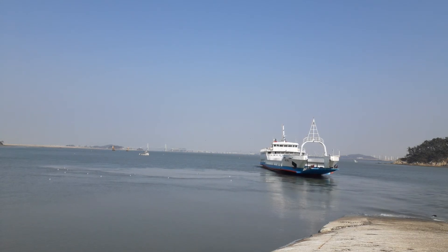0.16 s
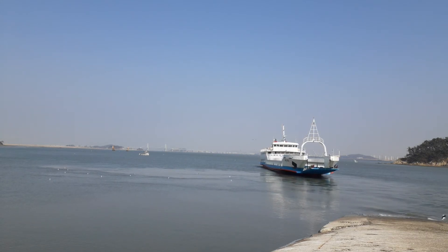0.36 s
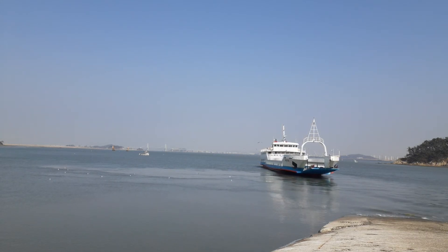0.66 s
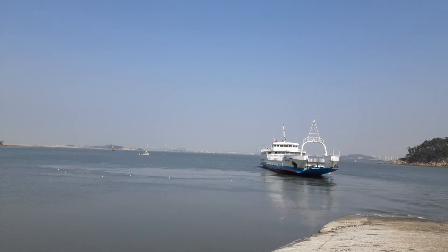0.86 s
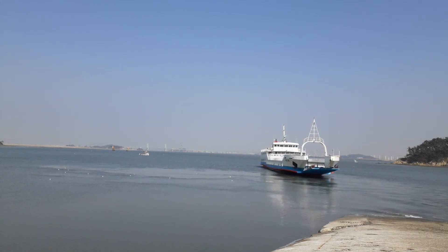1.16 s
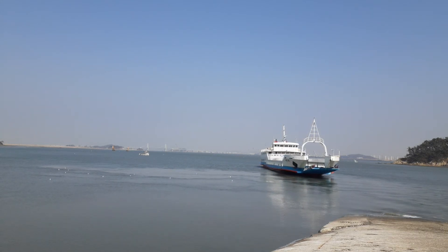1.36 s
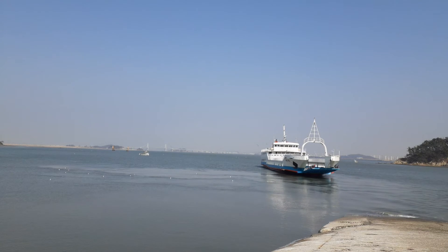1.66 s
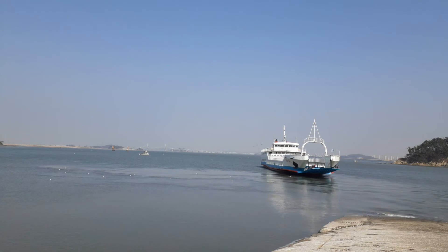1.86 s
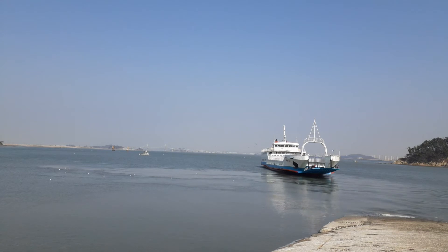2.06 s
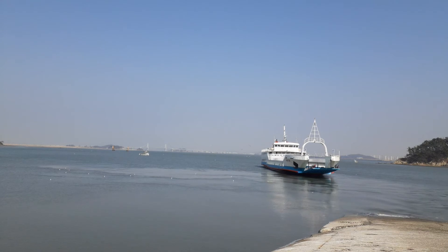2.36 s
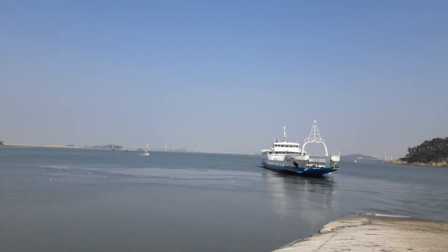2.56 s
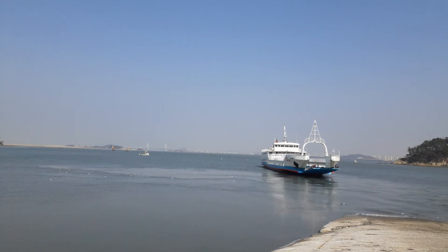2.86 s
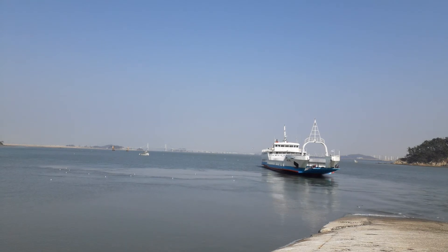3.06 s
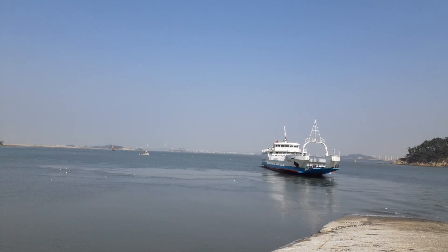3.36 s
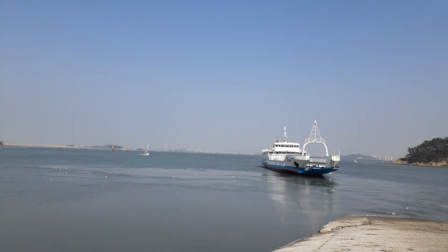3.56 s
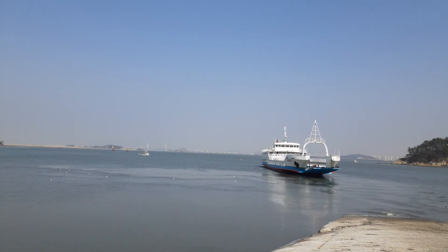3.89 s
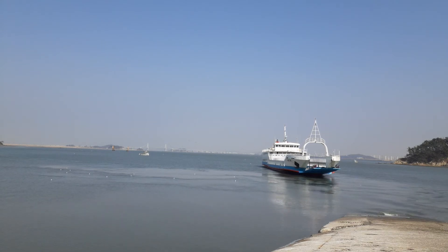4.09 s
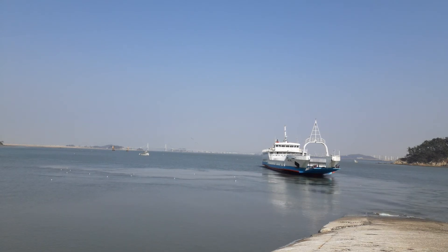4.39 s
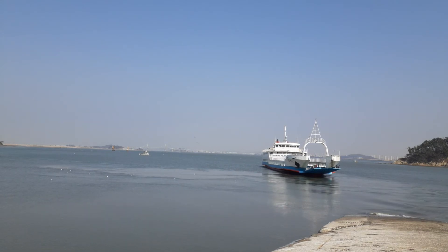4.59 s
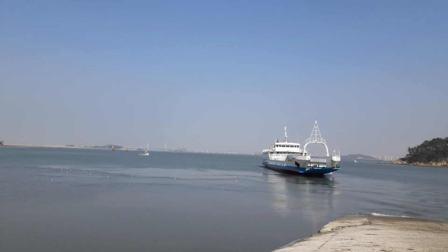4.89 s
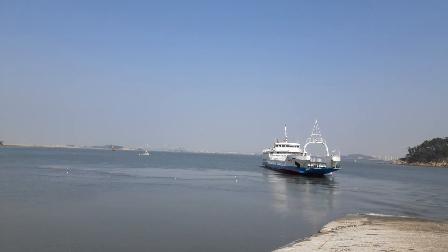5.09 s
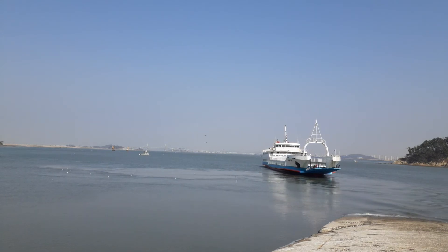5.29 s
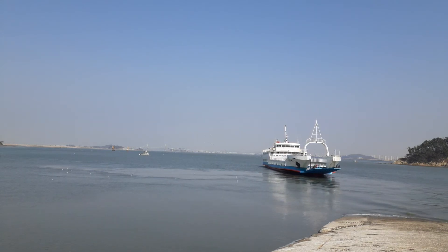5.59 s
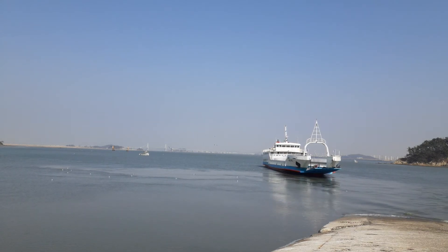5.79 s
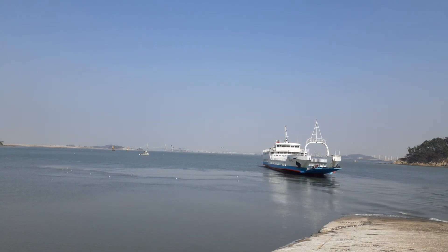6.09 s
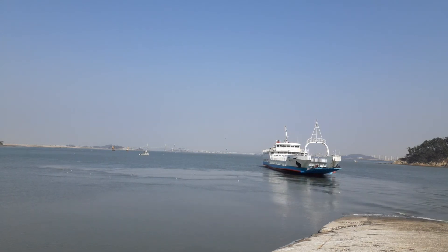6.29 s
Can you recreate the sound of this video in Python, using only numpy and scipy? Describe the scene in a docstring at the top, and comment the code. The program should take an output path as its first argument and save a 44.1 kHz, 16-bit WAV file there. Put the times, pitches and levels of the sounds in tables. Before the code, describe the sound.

A ferry idles a little way off a slipway, its diesel engines throbbing under a broad, dull rumble of exhaust, propellers and fans. A gull gives three short, hoarse, arched cries, a few seconds apart. Two low thuds come early and two more close together near the end. Small waves lap very faintly at the shore, and the microphone adds a slight hiss.

```python
"""A slipway on calm water, with a ferry idling in. Close diesel tones beat into a throb under a broad,
dull rumble of exhaust, propellers and fans, with a few soft thuds. Small waves wash the shore.
A gull gives three arched cries, each a thin rising lead-in that breaks into a full, hoarse stack
of harmonics shaped by its closing beak. The microphone adds a faint hiss."""
import sys
import numpy as np
from scipy import signal
from scipy.fft import rfft, irfft, next_fast_len
from scipy.io import wavfile
from scipy.ndimage import uniform_filter1d, map_coordinates

SR = 44100
rng = np.random.default_rng(int(sys.argv[2]) if len(sys.argv) > 2 else 0)


def digitize_waveform(pressure):
    """Quantize a signal to 16-bit integers and store it at the path in sys.argv[1].

    Rows of a 2-D input are taken as channels; values are limited to [-1, 1].
    """
    field = np.atleast_2d(pressure).T
    bounded = np.clip(field, -1, 1)
    quanta = np.round(bounded * 32767).astype(np.int16)
    wavfile.write(sys.argv[1], SR, quanta)


N = 284004

# Colours of the noise layers. Each row: frequency in Hz, relative level in dB.
HISS_COLOUR = [(1000, -13), (4600, -10), (5300, -4.5), (6400, 0), (9700, -.5), (10600, -4.5), (12200, -9),
               (15700, -9.3)]
WATER_COLOUR = [(500, -20), (1500, -2.5), (2100, 2.5), (2450, -1), (2750, -9.5), (3300, -11), (4200, -34),
                (9000, -42)]
FIZZ_COLOUR = [(1800, -25), (2600, -1), (3200, 1), (3700, -2.5), (6000, -11), (15000, -37)]
EXHAUST_COLOUR = [(20, -48), (30, -19), (40, -10), (55, 0.5), (80, -4), (95, -3.5), (115, 1.5), (140, -3.5),
                  (220, -3.5), (300, -10), (430, -16), (520, -24.5), (800, -42.5), (2000, -91)]
CHURN_COLOUR = [(150, -27.5), (270, -3.5), (350, -2.5), (440, -4.5), (560, -20.5), (1500, -73)]
FAN_COLOUR = [(150, -31), (400, -1), (520, -2), (650, 0.5), (800, -6.5), (1000, -13), (1180, -13),
              (1400, -18.5), (1590, -22), (1750, -36), (2500, -64), (5000, -80)]
KNOCK_COLOUR = [(100, -12), (250, 5.5), (600, -3), (900, 1.0), (1400, -12.5), (1800, -23.5),
                (4000, -46), (9000, -72)]
RASP_COLOUR = [(1200, -25), (1700, 2), (2300, 0), (2800, -6), (3300, -12), (4200, -4), (4900, -9),
               (8000, -30), (15000, -50)]
# Ripples up the slipway. Each row: crest time, rise and fall in seconds, level in dB.
SHORE_RIPPLES = [(.98, 0.14, .42, -83.5), (2.45, 0.5, 0.14, -82), (3.13, .14, .14, -86),
                 (4.05, .15, .15, -88), (4.55, .12, .18, -86), (6.42, 0.11, .2, -83.5)]
# Fader rides for the ferry's layers; only the swing about the mean is used.
# Each row: time in seconds, relative level in dB.
EXHAUST_RIDE = [(0.0, -45), (0.56, -41.5), (1.26, -41), (1.68, -45.5), (2.38, -43), (2.94, -45.5),
                (5.6, -45), (5.88, -42.3), (6.42, -42.5)]
CHURN_RIDE = [(0.0, -48.5), (1.4, -48.5), (1.54, -50.0), (1.96, -45), (2.94, -50.5), (3.36, -50.5),
              (4.76, -47.5), (5.04, -52.5), (5.18, -47), (5.6, -49), (6.42, -46.5)]
FAN_RIDE = [(0.0, -52.5), (0.98, -51.5), (1.12, -52), (1.68, -51), (4.06, -53), (5.18, -51), (5.46, -53.5),
            (6.42, -51.5)]
DIESEL_RIDE = [(0.0, -39.5), (0.7, -40), (0.98, -45.5), (1.26, -40), (1.82, -43.5), (2.38, -37.5),
               (2.66, -43.0), (3.22, -44), (4.2, -41), (5.32, -41.5), (5.6, -45.5), (5.88, -42),
               (6.42, -44.5)]
# The diesels' low hum. Each row: frequency in Hz, base level in dB.
DIESEL_TONES = [(35.3, -63), (70.55, -48), (76.6, -55), (83.5, -49.5), (105.8, -55.5), (152.8, -61),
                (176.2, -66.5)]
# Dull thuds. Each row: start in seconds, boom level in dB, knock level in dB.
THUD_HITS = [(1.098, -24, -48), (1.671, -29.5, -68), (2.763, -54, -47), (5.910, -29, -65),
             (6.083, -27.5, -69)]
# The gull's throat, beak wide and nearly shut. Each row: frequency in Hz, gain in dB.
THROAT_OPEN = [(780, -39), (1250, -12), (1520, -5), (1780, -4), (2080, 0.5), (2320, -1), (2750, -1),
               (3100, -5.5), (3500, -22), (3850, -40), (4600, -13.5), (5400, -20), (6200, -30), (8000, -51)]
THROAT_SHUT = [(780, -12), (1250, -1), (1520, 0.5), (1800, -2), (2250, -15), (3050, -15.5), (3400, -15.5),
               (3800, -19), (4400, -22), (5400, -33), (6200, -21), (8000, -49)]
# Thin false starts just before a cry. Each row: end in seconds, length in seconds, base level in dB.
GULL_SQUEAKS = [(2.159, 0.053, -75), (5.038, 0.041, -81)]
# The cries. Each row: start and length of the full voice in seconds, top pitch in Hz, share of pitch
# lost by the end, base level in dB, opening beak position from 0 (wide) to 1 (shut), EQ at 3, 3.8 and
# 4.5 kHz in dB, lengths of the lead-in and of its low-register end in seconds, lead-in offset in dB.
CRIES = [(0.33, 0.16, 767, 0.078, -59, .1, -4.5, -5, -3.5, 0.069, 0.0082, -7),
         (2.199, 0.18, 783.4, .138, -58.5, .1, 3.5, 0, 1.5, .055, 0.023, -3),
         (5.075, 0.17, 785, .125, -58.5, 0.24, 0.5, 2.5, -6.5, .045, 0.014, -5.5)]

BREAK_HZ, SLIDE_HZ_PER_S, LEAD_DB_PER_S = 717, 3200, 186  # the slide up to where the voice breaks
ARCH_TOP, BEAK_SHUT_AT = .38, 0.79  # shares of a cry's length
ATTACK_S, ATTACK_DB, RELEASE_S, RELEASE_DB, EDGE_S = .03, 5.5, 0.045, 13.5, 0.0093
BLOOM_DB, BLOOM_S = 4.5, 0.053  # the treble opens up as the voice settles


def amp(db):
    """Decibels to gain."""
    return 10 ** (np.asarray(db) / 20)


def unit(x):
    """Scale to rms 1."""
    return x / np.sqrt(np.mean(x ** 2) + 1e-20)


def along(points, hz):
    """Read an EQ curve on a log frequency axis."""
    freqs, values = np.transpose(points)
    return np.interp(np.log(hz + 1), np.log(freqs + 1), values)


def wobble(rate, size=N):
    """A smooth random curve, rate knots a second."""
    knots = rng.standard_normal(int(N * rate / SR) + 4)
    return map_coordinates(knots, [np.arange(size) * rate / SR])


def swing(ride):
    """A fader ride in dB about its own mean, one value per sample."""
    db = np.interp(np.arange(N) / SR, *np.transpose(ride))
    return db - db.mean()


def filtered(x, response):
    """EQ x with a gain given as a function of frequency."""
    size = next_fast_len(N + SR // 2)
    return irfft(rfft(x, size) * response(np.fft.rfftfreq(size, 1 / SR)), size)[:N]


def noise(colour):
    """Coloured noise of rms 1."""
    return unit(filtered(rng.standard_normal(N), lambda hz: amp(along(colour, hz))))


def add(out, start_s, x):
    """Mix a short sound into out."""
    i = round(start_s * SR)
    out[i:i + len(x)] += x[:N - i]


def wash(calm_db=-83.7, ebb_db_per_s=0.58, lapping_db=1, fizz_db=-10.0, fizz_growth=0.82):
    """Ripples run up the slipway over a slowly calming lap; the larger ones break into bright fizz."""
    t = np.arange(N) / SR
    power = amp(calm_db - ebb_db_per_s * t) ** 2
    for crest_s, rise_s, fall_s, db in SHORE_RIPPLES:
        width_s = np.where(t < crest_s, rise_s, fall_s)
        power += amp(db) ** 2 * np.exp(-((t - crest_s) / width_s) ** 2)
    level_db = 10 * np.log10(power) + lapping_db * wobble(12)
    fizz = amp(fizz_db + fizz_growth * (level_db - calm_db)) * noise(FIZZ_COLOUR)
    return amp(level_db) * (noise(WATER_COLOUR) + fizz)


def machinery(exhaust_db=-46.0, churn_db=-53.5, fan_db=-53.5, exhaust_depth=1.07, churn_depth=1.6):
    """The ferry's noise bed: exhaust rumble, churning propellers and fan roar, dulled by distance."""
    swell_db = exhaust_depth * swing(EXHAUST_RIDE) + wobble(8)
    exhaust = amp(exhaust_db + swell_db) * noise(EXHAUST_COLOUR)
    churn = amp(churn_db + churn_depth * swing(CHURN_RIDE)) * noise(CHURN_COLOUR)
    fans = amp(fan_db + swing(FAN_RIDE)) * noise(FAN_COLOUR)
    return exhaust + churn + fans


def diesels(drift_rad=0.49, fading_db=2.1, trim_db=-0.22, ride_depth=1.25):
    """Closely spaced engine tones beat into a throb and fade a little on their way over the water."""
    t = np.arange(N) / SR
    carry_db = trim_db + ride_depth * swing(DIESEL_RIDE)
    throb = np.zeros(N)
    for hz, db in DIESEL_TONES:
        gain = np.sqrt(2) * amp(db + carry_db + fading_db * wobble(2.505))
        phase = 2 * np.pi * hz * t + drift_rad * wobble(2.036) + rng.uniform(0, 2 * np.pi)
        throb += gain * np.sin(phase)
    return throb


def thuds(boom_hz=68, boom_t60=0.12, knock_t60=0.28, rise_s=0.0052):
    """Each thud layers a short low boom with a hollow, noisy knock."""
    out = np.zeros(N)
    hollow = noise(KNOCK_COLOUR)
    for start_s, boom_db, knock_db in THUD_HITS:
        t = np.maximum(np.arange(N) / SR - start_s, 0)
        boom = -np.sqrt(2) * np.sin(2 * np.pi * boom_hz * t) * amp(boom_db - 60 * t / boom_t60)
        knock = hollow * amp(knock_db - 60 * t / knock_t60)
        out += (1 - np.exp(-t / rise_s)) * (boom + knock)
    return out


def syrinx(pitch, level_db, closing, high, treble_db, colour,
           jitter=0.004, flutter_db=1.5, rasp_db=-18.5, slack_hz=740, slack_width_hz=30, thin_db=-17):
    """The gull's voice: ten harmonics, their weight shifting down to the second as the beak closes."""
    n = len(pitch)
    t = np.arange(n) / SR
    # slack membranes vibrate unevenly, so the low start and end of the arch are hoarse
    rough = 1 + np.clip((slack_hz - pitch) / slack_width_hz, 0, 2)
    pitch = pitch * (1 + jitter * rough * wobble(300, size=n))
    phase = 2 * np.pi * np.cumsum(pitch) / SR
    # turbulence puts a noisy skirt round every harmonic
    skirt = signal.butter(2, 300, fs=SR, output="sos")
    voice = np.zeros(n)
    for k in range(1, 11):
        hz = k * pitch
        throat_db = (1 - closing) * along(THROAT_OPEN, hz) + closing * along(THROAT_SHUT, hz)
        throat_db += k % 2 * thin_db * high  # odd harmonics duck: the high register is an octave up
        throat_db += along(colour, hz) + treble_db * (k > 3)  # the treble beams where the head points
        rasp = amp(rasp_db) * rough * unit(signal.sosfilt(skirt, rng.standard_normal(SR)))[:n]
        gain = amp(throat_db + flutter_db * wobble(46.6, size=n))
        voice += gain * (1 + rasp) * np.sin(k * phase + rng.uniform(0, 2 * np.pi))
    fades = np.clip(np.minimum(t, t[-1] - t) / EDGE_S, 0, 1)
    return np.sqrt(2) * voice * amp(level_db) * fades


def squeak(length_s, db):
    """The upward slide alone, in the high register with the beak wide."""
    t = np.arange(-length_s, 0, 1 / SR)
    pitch = BREAK_HZ + SLIDE_HZ_PER_S * t
    return syrinx(pitch, db, closing=0, high=0.78, treble_db=-4, colour=[(3000, 3), (4400, -8)])


def cry(length_s, top_hz, drop, db, beak_start, mid_db, upper_db, edge_db, lead_s, low_s, lead_db):
    """A thin lead-in slides up and breaks into the full voice, which arches over as the beak closes."""
    t = np.arange(-lead_s, length_s, 1 / SR)  # the full voice starts at zero
    progress = t / length_s
    arch = top_hz * (1 - drop * ((progress - ARCH_TOP) / (1 - ARCH_TOP)) ** 2)
    pitch = np.where(t < 0, BREAK_HZ + SLIDE_HZ_PER_S * t, arch)
    swell_db = np.interp(t, [0, ATTACK_S, length_s - RELEASE_S, length_s],
                         [-ATTACK_DB, 0, 0, -RELEASE_DB])
    level_db = db + np.where(t < 0, lead_db + LEAD_DB_PER_S * t, swell_db)
    closing = np.clip(beak_start + (1 - beak_start) * progress / BEAK_SHUT_AT, 0, 1)
    high = np.clip((-low_s - t) / EDGE_S + .5, 0, 1)  # crossfade from high register to low
    treble_db = np.interp(t, [0, BLOOM_S], [-BLOOM_DB, 0])
    colour = [(2400, 0.5), (2950, mid_db), (3200, mid_db), (3750, upper_db),
              (4350, edge_db), (4750, edge_db), (5400, -4.0)]
    pitch, level_db = uniform_filter1d([pitch, level_db], size=200)  # round off the break
    return syrinx(pitch, level_db, closing, high, treble_db, colour)


def gull(echo_db=-19, t60=0.38, rasp_s=0.047, rasp_db=-79):
    """Two squeaks and three cries that break off hoarsely; the shore scatters back a short tail."""
    voice, rasp_gate = np.zeros(N), np.zeros(N)
    for start_s, length_s, *tone, lead_s, low_s, lead_db in CRIES:
        add(voice, start_s - lead_s, cry(length_s, *tone, lead_s, low_s, lead_db))
        rasp_gate += np.exp(-.5 * ((np.arange(N) / SR - start_s - length_s) / rasp_s) ** 2)
    for end_s, length_s, db in GULL_SQUEAKS:
        add(voice, end_s - length_s, squeak(length_s, db))
    direct = voice + amp(rasp_db) * rasp_gate * noise(RASP_COLOUR)
    t = np.arange(SR // 2) / SR
    tail = rng.standard_normal(len(t)) * amp(-60 * t / t60) * (1 - np.exp(-t / .02))
    echo = signal.fftconvolve(direct, tail / np.linalg.norm(tail))[:N]
    return direct + amp(echo_db) * echo


def scene():
    """The mono mix: the gull over the ferry and the shore."""
    return (gull() + diesels() + machinery() + thuds() + wash())[None]


def record(dry, hiss_db=-76.0, low_cut_hz=30, top_hz=15760):
    """The microphone's own hiss, its bass roll-off and a hard treble cut."""
    sound = dry[0] + amp(hiss_db) * noise(HISS_COLOUR)
    sound *= signal.windows.tukey(N, .002)
    return filtered(sound, lambda hz: (hz < top_hz) * hz ** 4 / np.hypot(hz ** 4, low_cut_hz ** 4))[None]


dry = scene()
out = record(dry)
digitize_waveform(out)
```